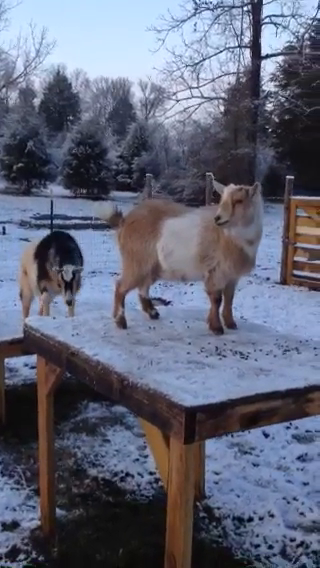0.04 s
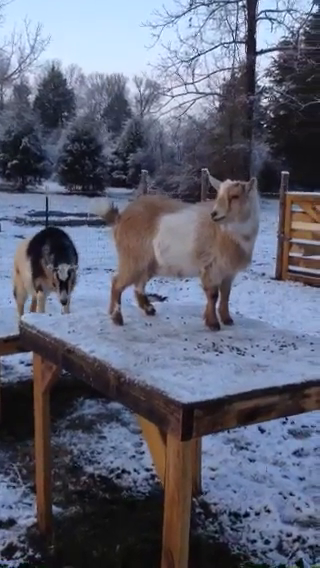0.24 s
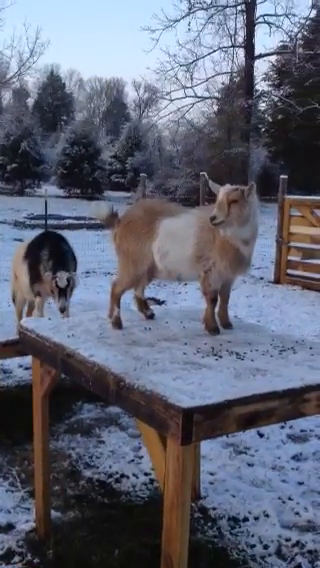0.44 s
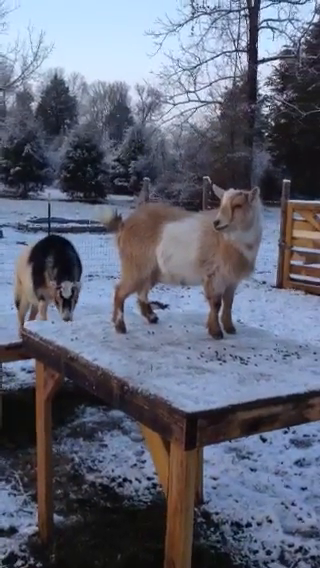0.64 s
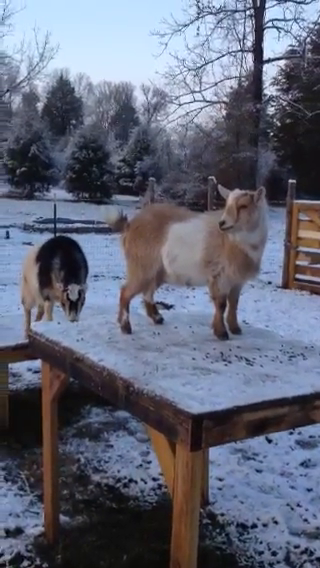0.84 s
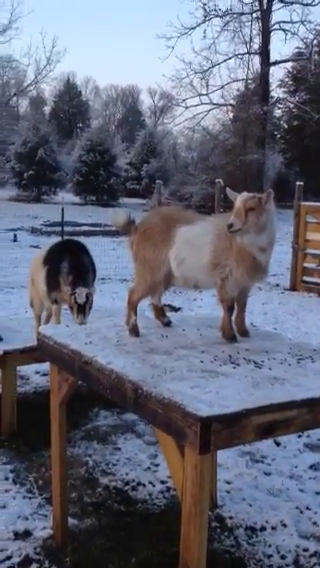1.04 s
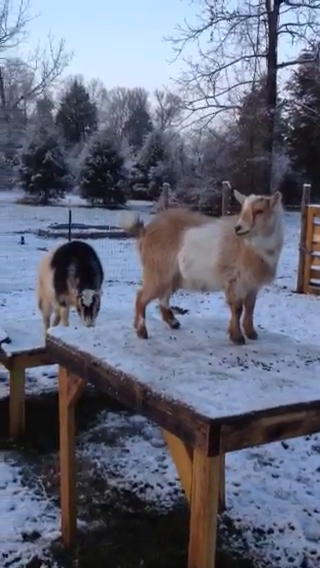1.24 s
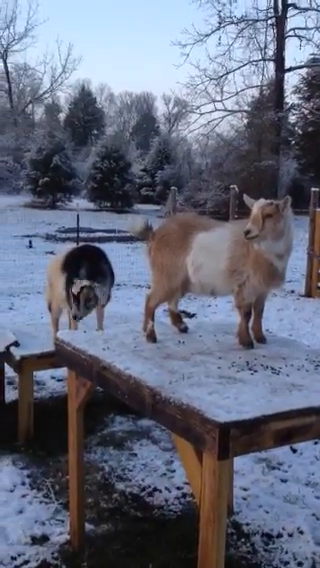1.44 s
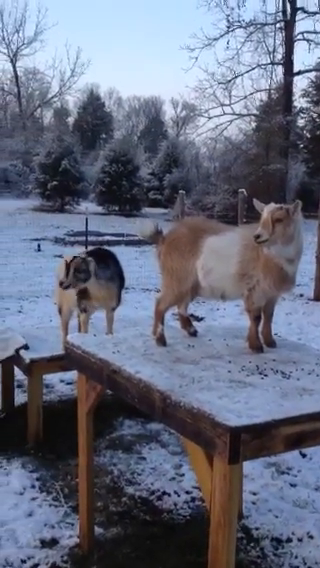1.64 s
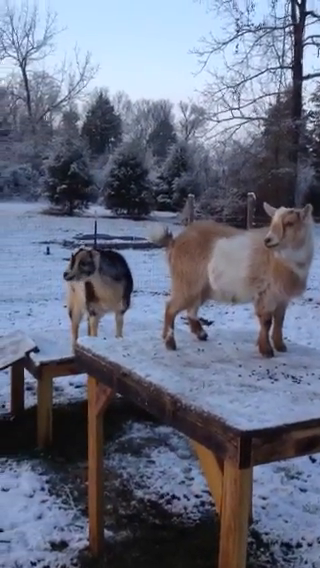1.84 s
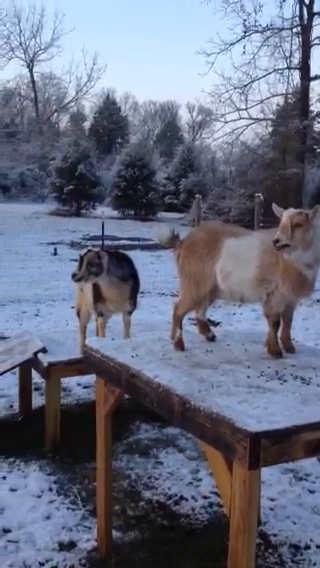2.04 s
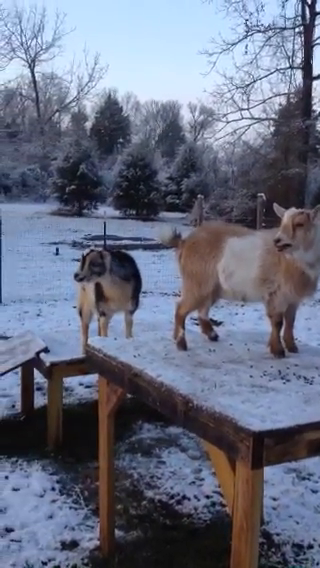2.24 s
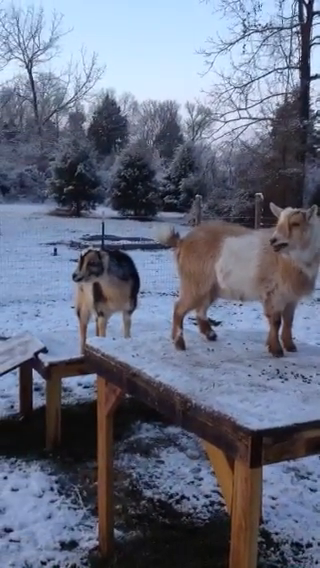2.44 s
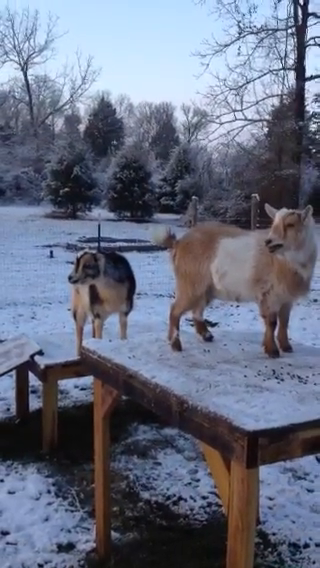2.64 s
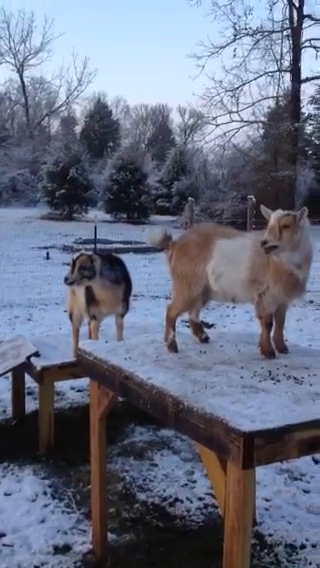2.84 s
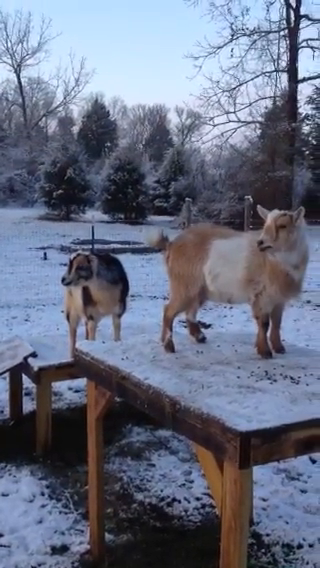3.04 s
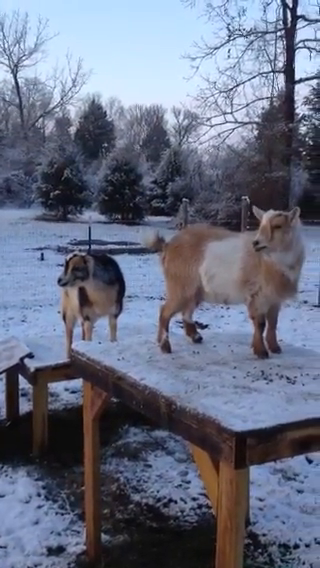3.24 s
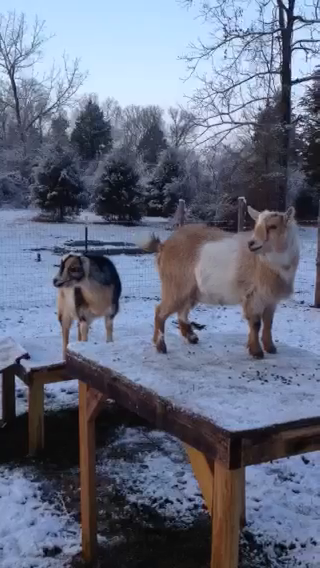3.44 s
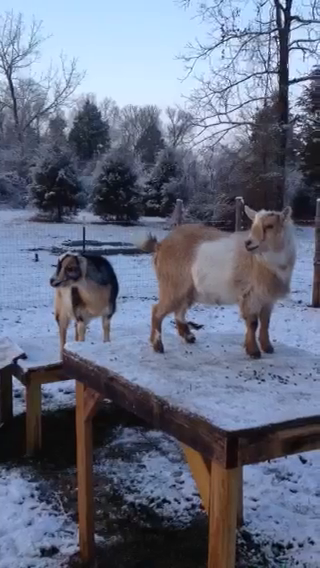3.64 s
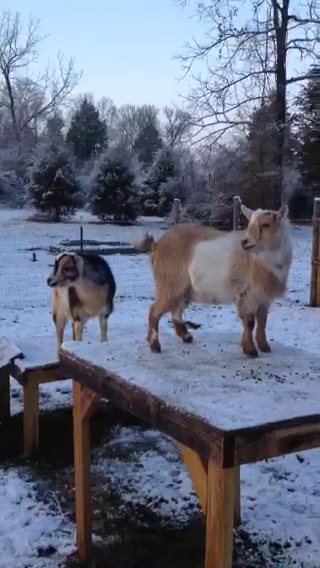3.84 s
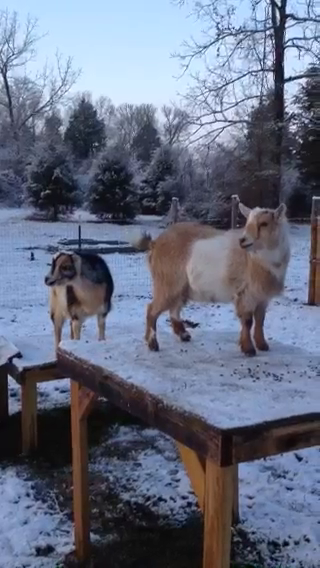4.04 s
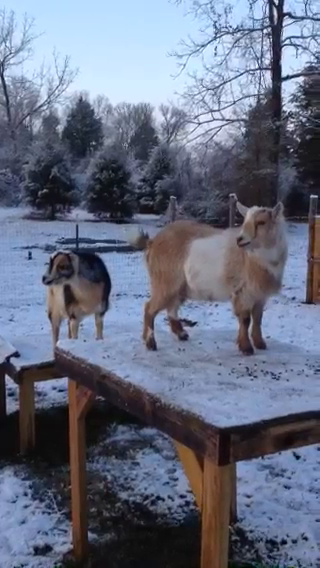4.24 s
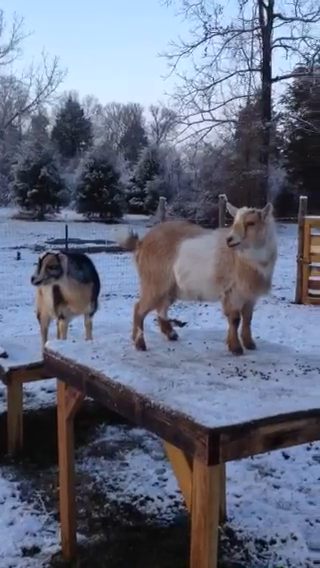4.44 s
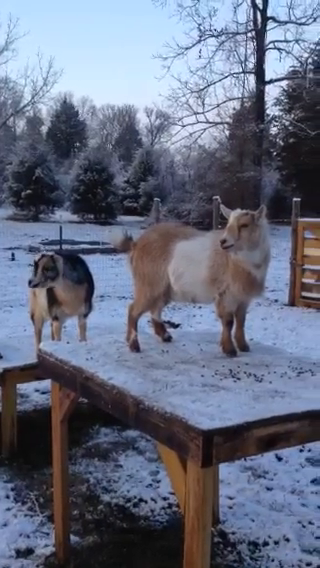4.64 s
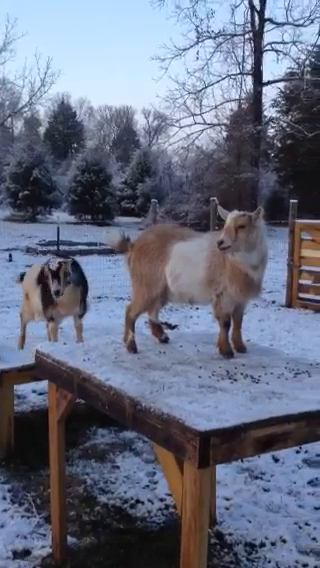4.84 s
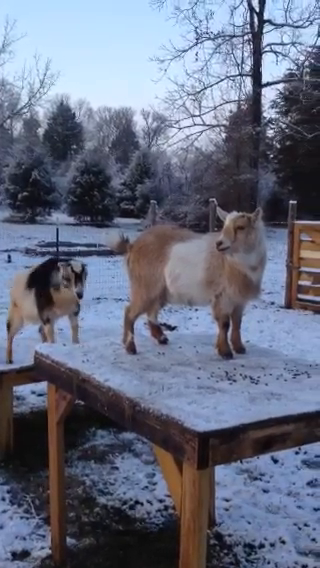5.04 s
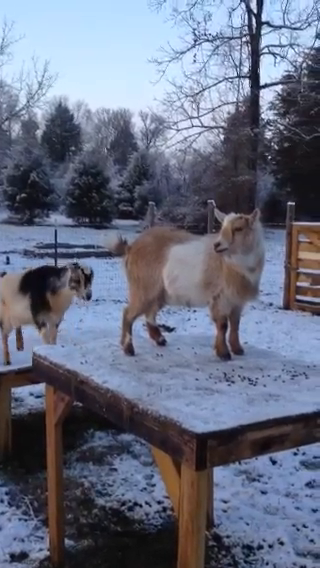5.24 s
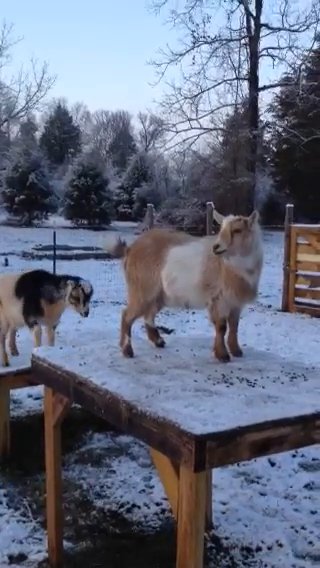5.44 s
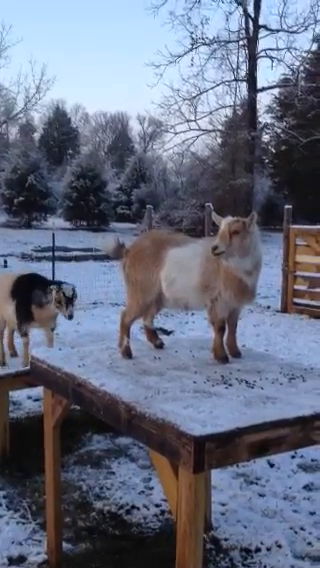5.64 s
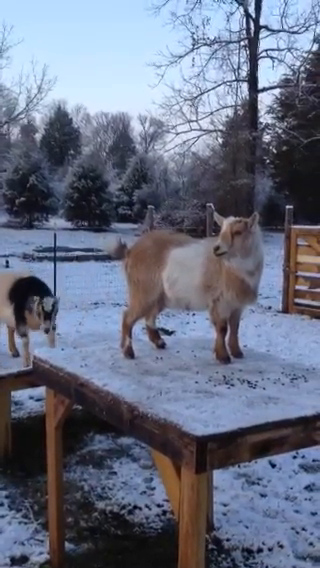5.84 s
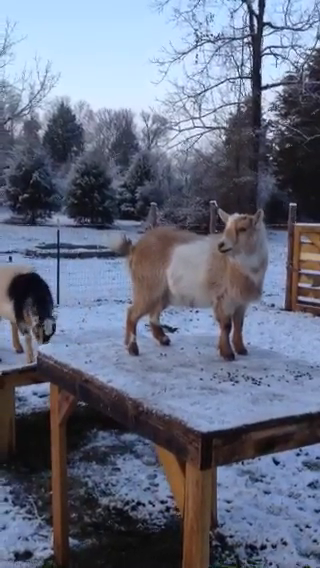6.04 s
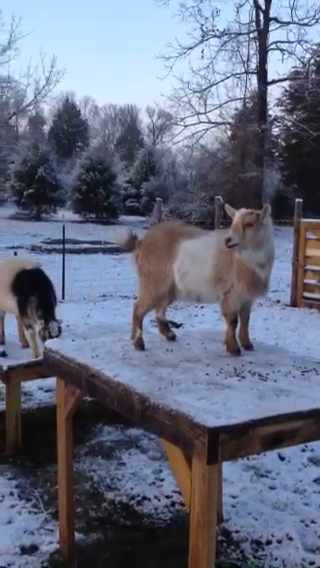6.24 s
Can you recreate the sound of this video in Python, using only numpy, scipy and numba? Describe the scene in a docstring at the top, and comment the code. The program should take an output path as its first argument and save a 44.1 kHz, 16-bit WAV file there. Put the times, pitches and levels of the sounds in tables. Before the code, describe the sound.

Still outdoor air with a very faint motor hum and rustle. A few light hoof taps on a wooden platform come first, with a barely audible far call. Around two seconds a goat puffs, then gives one loud, rough, fast-quavering bleat lasting about a second. Quiet returns, then a second goat's hooves knock and scuff on snowy boards. Close voice, short dull reflections, handheld microphone.

```python
"""Goat on a wooden platform in snow

A goat gives a short puff of breath, then one long quavering bleat: glottal pulses and turbulence excite
resonances of mouth and throat, and the voice cracks into slow hard pulses. Hooves strike resonant boards,
scuffs and the puff are swells of grainy noise, and delayed copies return from boards and wall. Behind lie
still winter air (coloured noise), a motor's hum (wavering sines), a faint rustle, one faint far call and
a thin high squeak (gliding tones).
"""
import sys
import numpy as np
from scipy import signal
from scipy.fft import rfft, irfft
from scipy.io import wavfile
from scipy.ndimage import uniform_filter1d
from numba import njit

SR = 44100
rng = np.random.default_rng(int(sys.argv[2]) if len(sys.argv) > 2 else 0)


def persist_wave(psi):
    """Save psi, clipped to +-1, as 16-bit WAV."""
    counts = np.round(np.clip(psi, -1, 1) * 32767).astype(np.int16)
    wavfile.write(sys.argv[1], SR, np.atleast_2d(counts).T)


N = 278271
TIME = np.arange(N) / SR

# Relative spectrum of still air, with a broad band of the motor hum near 120 Hz: (frequency [Hz], spectral
# density [dB per Hz])
AIR_SPECTRUM = [(25, -65), (48, -23.5), (60, -15), (85, -26), (120, -5), (150, -11), (330, -10.5),
                (530, -11.5), (940, -16.5), (1760, -23.5), (2540, -24.5), (6500, -36), (10300, -49.5),
                (13000, -37)]
# Partials of the motor hum: (frequency [Hz], mean level [dB])
HUM_PARTIALS = [(118.4, -66), (296.1, -74), (333.8, -74.5), (479.1, -77.5), (532.9, -80), (651.4, -80.5),
                (888.2, -76.5)]
# Course of the faint rustle: (time [s], mean level [dB])
RUSTLE_COURSE = [(0, -72), (.25, -72), (.6, -77.5), (3, -77), (5, -78.5), (5.6, -75), (6.31, -75.5)]
# Thin squeak: (time [s], frequency [Hz], mean level [dB])
SQUEAK_COURSE = [(1.44, 12200, -95), (1.51, 12850, -84), (1.55, 12400, -86), (1.62, 13400, -82),
                 (1.68, 12700, -86), (1.77, 11800, -84), (1.8, 12200, -81), (1.83, 11900, -95)]
# Far call: (time [s], frequency [Hz], mean level [dB])
FAR_CALL_COURSE = [(.8, 557, -82), (.85, 590, -69), (.92, 551, -63.5), (.97, 605, -61.5), (1.0, 603, -73)]
# Echoes from boards and wall: (delay [s], level within the reflected sound [dB], low-pass cut-off [Hz])
YARD_ECHOES = [(.0058, -20, 6200), (0.0224, -13, 3570)]
# Snow scuffs, and at 1.925 s a short puff of the goat's breath before the bleat:
# (middle [s], length [s], level before the shared resonance [dB], centre frequency [Hz])
SCUFFS_AND_BREATH = [(0.156, 0.017, -67.5, 3980), (1.566, 0.023, -69, 3340), (1.925, 0.022, -63, 3900),
                     (5.165, 0.029, -66.5, 2190), (5.261, 0.021, -59, 1220), (5.485, 0.096, -63, 2300),
                     (5.728, 0.022, -59.5, 2040), (5.823, 0.0086, -61.5, 2000), (6.003, 0.19, -71, 2370),
                     (6.238, 0.016, -66, 2400)]
# Resonance shared by these swells, as the boards sing under a scuff: (frequency [Hz], width [Hz], lift [dB])
SCUFF_RESONANCE = [(4580, 100, 8.5)]
# Hoof knocks; the row at 5.7808 s is the wall's return of the knock at 5.757 s:
# (time [s], thud [dB], body [dB], clack [dB], crack [dB], tick [dB],
# note of the struck spot [Hz], decay time of the crunch [s], wall echo [dB])
KNOCKS_AND_RETURN = [(.469, -64.5, -64, -64, -69, -74, 1110, 0.016, -7),
                     (1.0512, -53, -51, -56.5, -63, -73, 620, 0.0048, -6.5),
                     (1.262, -77, -76, -54, -72, -76, 1130, 0.0032, -3),
                     (5.1135, -47, -49.5, -61, -59, -59.5, 227, 0.0071, -6),
                     (5.188, -65, -62, -68, -67.5, -70, 1400, .006, -12),
                     (5.3136, -53.5, -49.5, -52.5, -65.5, -71, 990, 0.0097, -9),
                     (5.351, -74, -65, -70, -70, -74.5, 1500, 0.0047, -8),
                     (5.4862, -44.5, -43.5, -51, -49.5, -50.5, 392, 0.013, -12),
                     (5.517, -69, -62, -55, -57.5, -68, 396, 0.011, -17),
                     (5.6782, -64, -59, -64, -63.5, -66.5, 605, 0.0035, -6),
                     (5.757, -56, -61, -58.5, -66, -68.5, 1150, .012, -4),
                     (5.7808, -62.5, -63, -54.5, -64, -71, 1210, .006, -8),
                     (5.9650, -66, -58, -54, -58.5, -62.5, 1250, 0.0034, -4.5),
                     (6.169, -79, -60, -58.5, -64.5, -63, 1070, 0.0094, -6.5)]
# Edges of the thud, body, clack, crack and tick bands: (frequency [Hz])
KNOCK_EDGES = [130, 330, 800, 1800, 3600, 7200]
# Resonances of the boards: (frequency [Hz], width [Hz], lift [dB])
BOARD_RESONANCES = [(165, 65, 2.5), (230, 54, 4.5), (315, 45, 4), (402, 21, 11), (504, 16, 7), (742, 60, 5),
                    (1630, 120, -0.5), (2320, 120, 7.5), (3100, 120, 4.5), (4300, 140, 8), (4570, 106, 9)]
# Bleat beneath its quaver: (time [s], resting pitch [Hz], base vowel level [dB], base rasp level [dB])
BLEAT_COURSE = [(2.014, 325.8, -63, -61.5), (2.055, 332.6, -51, -53), (2.078, 314, -58, -47.5),
                (2.1, 320, -50, -46), (2.14, 338, -56, -45.5), (2.24, 347.7, -46.5, -43),
                (2.41, 352.5, -49, -44.5), (2.54, 381.7, -47.5, -44.5), (2.61, 355, -43.5, -43),
                (2.70, 365.5, -46.5, -43), (2.765, 379.2, -47.5, -42.5), (2.84, 370.7, -44, -43),
                (2.91, 381.8, -46.5, -43), (2.98, 363.3, -48.5, -46.5), (3.015, 336.2, -47, -50.5),
                (3.04, 286, -44.5, -56.5), (3.052, 180, -45, -53), (3.068, 160.7, -49, -53.5),
                (3.09, 161, -52, -69)]
# Crests of the quaver, about fourteen a second: (time [s], length [s], top pitch [Hz], rasp lift [dB],
# bright-ring centre [Hz], added turbulence [0-1], slap after it [dB], vowel throb after it [dB])
QUAVER_CRESTS = [(2.025, 0.03, 401.3, 8.5, 4550, 0.4, 4.5, 1), (2.125, 0.024, 405.4, 6.5, 4850, .05, 4, 14),
                 (2.202, 0.025, 404, 2.5, 5370, 0, 2.5, 7.5), (2.261, .022, 408.7, 0.5, 5500, 0, -1, 5),
                 (2.322, 0.022, 408.4, 1.5, 5070, 0.3, -1, 6.5),
                 (2.379, 0.033, 430, 5.5, 5030, .05, 2.5, 7), (2.447, 0.034, 435.3, 9, 5360, 0.3, 5, 7.5),
                 (2.508, 0.032, 428, 3.5, 4900, 0, 0, 4), (2.575, 0.028, 451, 7, 4530, 0.6, 1, 2),
                 (2.661, .03, 437.7, 6, 4900, 0.4, 1.5, 3.5), (2.733, 0.032, 428.2, 2, 5470, 0.3, -3, 5.5),
                 (2.795, 0.036, 452.1, 4.5, 4730, 0.2, -1, 1.5),
                 (2.878, 0.031, 445.6, 2.5, 5460, 0.3, -1.5, 4), (2.939, 0.023, 416, 3, 6080, 0, 0, 1.5)]
# Cracks into slow pulses: (peak [s], length before the peak [s], pulse rate at the peak [Hz],
# peak level change [dB], width of the burst [s])
VOICE_CRACKS = [(2.112, 0.046, 234.4, 9.5, 0.018), (2.182, .022, 263.3, 10.5, 0.017),
                (2.249, 0.014, 286.5, 7.5, 0.015), (2.308, 0.01164, 275.4, 8.5, 0.019),
                (2.6414, 0.028, 282.6, 8, 0.023)]
# Moments when the rasp catches: (time [s], length [s], level change [dB])
RASP_CATCHES = [(2.074, 0.02, 0), (2.134, 0.0066, -7), (2.163, .012, -5.5), (2.217, 0.011, -4),
                (2.24, 0.0078, -4), (2.299, .008, -5), (2.358, 0.0075, -6), (2.423, 0.0093, -4),
                (2.459, 0.0087, -7.5), (2.498, 0.0062, 1), (2.558, .012, -1.5), (2.68, .007, -6),
                (2.71, 0.0098, -2.5), (2.754, 0.011, -2.5), (2.85, 0.019, -5.5), (2.894, .012, -1.5)]
# Opening and closing mouth: (time [s], first resonance [Hz], base bright-ring lift [dB],
# base top-treble lift [dB])
MOUTH_COURSE = [(2.036, 675, 5, -6), (2.055, 714, -14, 14), (2.12, 930, 7.5, 5), (2.22, 1044, 1, 12.5),
                (2.4, 1090, 8, 2), (2.55, 1098, 7.5, 1.5), (2.97, 1088, 7.5, 5), (3.005, 920, 9, -1),
                (3.04, 806, -5, -3), (3.08, 684, -6, -5)]
# Small fixed resonance of the mouth: (frequency [Hz], width [Hz], lift [dB])
VOWEL_RESONANCE = [(905, 50, 7)]
# Resting resonances and hollows of throat and nose: (frequency [Hz], width [Hz], lift [dB])
UPPER_RESONANCES = [(1950, 400, 4), (3130, 60, 2), (3590, 80, 4), (3930, 130, 5), (4750, 70, 11.5),
                    (5005, 170, -15), (5190, 70, 4), (5550, 120, 4), (5960, 70, 3), (6400, 500, 1),
                    (7000, 130, 3), (7380, 140, 4), (8500, 500, -5)]

# Hooves: a knock's band levels are its power over KNOCK_S; the toe touches first and more lightly
KNOCK_S, HEEL_S, TOE_SHARE = .018, 0.001986, .35
# Quaver: squareness 2 is a round bell, more gives a flat top
CREST_SQUARENESS = 2.6
CREST_LEAN_S, CREST_PUSH_SHARE = 0.0028, 0.8   # offset and relative length of the push on the rasp
# After a crest the vowel dips, then the folds slap; the moments are shares of the crest's length
DIP_AT, DIP_S, DIP_DB = 0.67, 0.013, -10
FLARE_AT, FLARE_S, FLARE_TOP_DB = 0.96, 0.0054, 7.5
# Cracks: the pulses speed up, then the voice snaps back; each starts choked and bursts out abruptly
CRACK_RISE_HZ_PER_S, CRACK_RELEASE_S = 2200, .008
CHOKE_DB, BURST_SQUARENESS = -9, 2.7
CRACK_RING_DB, CRACK_CLEARS = 8.5, .5   # extra bright ring; share of turbulence that stops
# Folds: random pitch deviation as a share of pitch; they take a while to settle
JITTER, CREAK_JITTER, UNSTEADY_JITTER, UNSTEADY_S = .007, .025, .036, .36
TURBULENCE, ONSET_TURBULENCE, ONSET_S = .24, 1.0, .06
TROUGH_TURBULENCE, FIRM_DB = .38, 5   # hiss of slack folds; push that firms them fully
# Mouth: moving first resonance; share of the crack's swing that reaches the vowel
MOUTH_WIDTH_HZ, MOUTH_LIFT_DB, VOWEL_FOLLOWS = 50, 17.5, 0.16
SHUT_HZ, OPEN_HZ = 740, 1087   # first resonance when nearly shut and when open
# Throat: a resonance heard through the open mouth, and a hollow around it when nearly shut
THROAT_HZ, THROAT_WIDTH_HZ, THROAT_DB, SHUT_HOLLOW_DB = 2588, 66, 12.5, -5.5
THROAT_GIVE, THROAT_TREMBLE = 0.058, 0.0058   # relative shift per share of pitch rise, and by chance
# Bright ring: it slides down through each crest, and its lift follows the crest's push (dB per dB)
REST_RING_HZ, RING_WIDTH_HZ, RING_WANDER_HZ = 6560, 1400, 250
RING_FALL_HZ_PER_S, CREST_RING_GAIN = 38000, 0.85
# Nose: it rings as the mouth closes
NASAL_HZ, NASAL_WIDTH_HZ, NASAL_DB, CLOSING_S = 1725, 69, 18, 0.18
# Sizzle: thin airy top; level against the rasp and share of the rasp's swings
SIZZLE_BAND_HZ, SIZZLE_DB, SIZZLE_FOLLOWS = [10900, 14600], -36, .8


def from_db(db):
    """Logarithmic level: decibels to amplitude gain."""
    return 10 ** (np.asarray(db) / 20)


def rms_one(x):
    """Normalisation: scale to unit mean power."""
    return x / np.sqrt(np.mean(x ** 2) + 1e-20)


def constant(value):
    """Stationarity: a curve that keeps one value."""
    return np.full(N, float(value))


def in_time(rows):
    """Linear interpolation: one curve for each column after time."""
    s, *columns = np.transpose(rows)
    return [np.interp(TIME, s, c) for c in columns]


def smooth(x, seconds):
    """Moving average: two equal windows give a triangular weighting."""
    size = max(1, int(seconds * SR))
    return uniform_filter1d(uniform_filter1d(x, size), size)


def span(start_s, end_s, edge_s):
    """Gating: open between two moments, with soft edges."""
    return smooth(1. * (TIME > start_s) * (TIME < end_s), edge_s)


def during(rows):
    """Gating: open over the span of a table."""
    return span(rows[0][0], rows[-1][0], 0.0059)


def bell(s, length_s, squareness=2):
    """Envelope: a swell of height 1 around a moment, length_s wide at half height."""
    offset = np.minimum(np.abs(2 * (TIME - s) / length_s), 10)
    return np.exp(-np.log(2) * offset ** squareness)


def drift(rate_hz):
    """Random modulation: joined chance values of unit spread, rate_hz of them a second."""
    knots = rng.standard_normal(4000)
    return np.interp(TIME * rate_hz, np.arange(len(knots)), knots)


def cut(x, hz, kind, order=2):
    """Band limitation: a Butterworth filter."""
    edges = np.clip(hz, 10, .45 * SR)
    return signal.sosfilt(signal.butter(order, edges, kind, fs=SR, output="sos"), x + 1e-18)


def tone(hz):
    """Phase integration: a sine of unit power along a pitch curve."""
    return np.sqrt(2) * np.sin(2 * np.pi * np.cumsum(hz) / SR)


def noise(spectrum):
    """Spectral shaping: coloured noise with unit power above 150 Hz."""
    hz, level_db = np.transpose(spectrum)
    bins = np.maximum(np.fft.rfftfreq(N, 1 / SR), 1)
    colour = from_db(np.interp(np.log(bins), np.log(hz), level_db))
    out = irfft(rfft(rng.standard_normal(N)) * colour, N)
    return out / np.std(cut(out, 150, "high"))


def resonate(x, peaks):
    """Resonance: a chain of fixed modes, each lifting or lowering its own band."""
    for hz, width_hz, lift_db in peaks:
        a = np.pi * width_hz / SR
        c = -2 * np.cos(2 * np.pi * hz / SR)
        g = from_db(lift_db)
        x = signal.lfilter([1 + a * g, c, 1 - a * g], [1 + a, c, 1 - a], x)
    return x


@njit
def sweep(x, hz, width_hz, lift):
    """Time-varying resonance: a state-variable filter whose centre and gain may move."""
    out, band, low = np.zeros(len(x)), 0., 0.
    for i in range(len(x)):
        g, k = np.tan(np.pi * hz[i] / SR), width_hz / hz[i]
        v = (band + g * (x[i] - low)) / (1 + g * (g + k))
        band, low = 2 * v - band, low + 2 * g * v
        out[i] = x[i] + (lift[i] - 1) * k * v
    return out


def still_air():
    """Broadband noise: a coloured floor with two resonances."""
    return from_db(-64) * resonate(noise(AIR_SPECTRUM), [(1746, 122, 7.3), (4470, 85, 6.5)])


def motor_hum(waver_hz=2.2, flutter_db=-1.0):
    """Additive synthesis: partials that each waver at random in pitch and level."""
    hum = 0
    for hz, level_db in HUM_PARTIALS:
        partial = tone(hz + waver_hz * drift(14))
        hum = hum + from_db(level_db + flutter_db * drift(11)) * partial
    return hum


def faint_rustle():
    """Amplitude modulation: band noise whose level wavers about a slow course."""
    hiss = rms_one(cut(rng.standard_normal(N), [2000, 9000], "band", order=1))
    return from_db(in_time(RUSTLE_COURSE)[0] + 2.3 * drift(32)) * hiss


def faint_call(rows):
    """Frequency modulation: a nearly pure gliding tone, slightly unsteady."""
    hz, level_db = in_time(rows)
    unsteady_hz = smooth(hz, 0.016) * (1 + 0.0023 * drift(160))
    return during(rows) * from_db(level_db + 2 * drift(50.5)) * tone(unsteady_hz)


def scatter(x, t60, start_s, band_hz):
    """Diffuse reflection: convolution with a decaying noise tail of unit energy, then a band limit."""
    t = TIME[:SR // 2]
    tail = rng.standard_normal(len(t)) * np.exp(-np.log(1000) * t / t60) * (t > start_s)
    return cut(signal.fftconvolve(x, tail / np.linalg.norm(tail))[:N], band_hz, "band")


def yard(x, wet_db):
    """Reflection: distinct echoes, and a short scatter from fence and trees that the snow soon swallows."""
    wet = from_db(-12) * scatter(x, 0.21, 0.0046, [100, 5000])
    for delay_s, echo_db, cut_hz in YARD_ECHOES:
        dulled = cut(x, cut_hz, "low", order=1)
        wet += from_db(echo_db) * np.interp(TIME - delay_s, TIME, dulled, left=0)
    return x + from_db(wet_db) * wet


def scuffs_and_breath(grain_db=4.5):
    """Granular noise: brief swells as snow is pushed aside, and one puff of breath made the same way."""
    grains, out = rng.standard_normal(N) * from_db(grain_db * drift(600)), 0
    for s, length_s, level_db, hz in SCUFFS_AND_BREATH:
        swell = np.exp(-2 * ((TIME - s) / length_s) ** 2)
        out = out + from_db(level_db) * swell * rms_one(cut(grains, [hz / 2, hz * 2], "band"))
    return resonate(out, SCUFF_RESONANCE)


def hooves(crunch=0.094, grain_db=6, note_q=5.5, note_db=13, wall_s=0.02, wall_hz=5000):
    """Impact excitation: toe, heel and crushed snow ring the boards, and the wall returns a dull echo."""
    t, out = TIME[:SR // 4], np.zeros(N + SR)
    # the wall's return that has its own row is built like a knock
    for s, *levels_db, note_hz, fade_s, echo_db in KNOCKS_AND_RETURN:
        contact = crunch * rng.standard_normal(len(t)) * from_db(grain_db * drift(883)[:len(t)])
        contact *= np.minimum(t / HEEL_S, 1) * np.exp(-t / fade_s)
        contact[0] += TOE_SHARE
        contact[int(HEEL_S * SR)] += 1
        wood = resonate(contact, BOARD_RESONANCES + [(note_hz, note_hz / note_q, note_db)])
        knock = 0
        for k, level_db in enumerate(levels_db):
            band = cut(wood, KNOCK_EDGES[k:k + 2], "band", order=3)
            knock = knock + from_db(level_db) * np.sqrt(KNOCK_S * SR) * band / np.linalg.norm(band)
        echo = from_db(echo_db) * cut(knock, wall_hz, "low", order=1)
        for start_s, sound in (s, knock), (s + wall_s, echo):
            at = int(start_s * SR)
            out[at:at + len(t)] += sound
    return out[:N]


def quaver(rest_hz):
    """Vibrato: crests lift pitch and rasp, roughen the voice and lower the bright ring; a slap follows."""
    pitch_hz, lift_db, centre_hz, rough = rest_hz, 0, REST_RING_HZ, 0
    for s, length_s, top_hz, crest_db, ring_hz, turbulence, slap_db, _ in QUAVER_CRESTS:
        pitch_hz = pitch_hz + bell(s, length_s, CREST_SQUARENESS) * (top_hz - rest_hz)
        # the rasp peaks a little after the pitch
        late_s = s + CREST_LEAN_S
        push = bell(late_s, CREST_PUSH_SHARE * length_s)
        lift_db = lift_db + push * crest_db + slap_db * bell(s + FLARE_AT * length_s, FLARE_S)
        rough = rough + push * turbulence
        slide_hz = ring_hz - RING_FALL_HZ_PER_S * (TIME - s - CREST_LEAN_S)
        centre_hz = centre_hz + bell(late_s, length_s, CREST_SQUARENESS) * (slide_hz - REST_RING_HZ)
    return pitch_hz, lift_db, centre_hz, rough


def after_crests(share, length_s):
    """Periodic modulation: one short swell at the same stage of every quaver."""
    return sum(bell(s + share * crest_s, length_s) for s, crest_s, *_ in QUAVER_CRESTS)


def cracks(pitch_hz):
    """Register break: slow quickening pulses; gives pitch [Hz], degree of crack [0-1] and swing [dB]."""
    cracked, swing_db = 0, 0
    for s, length_s, rate_hz, peak_db, burst_s in VOICE_CRACKS:
        inside = span(s - length_s, s + CRACK_RELEASE_S, 0.0051)
        pitch_hz = pitch_hz + inside * (rate_hz + CRACK_RISE_HZ_PER_S * (TIME - s) - pitch_hz)
        burst = bell(s, burst_s, BURST_SQUARENESS)
        swing_db = swing_db + inside * (CHOKE_DB + (peak_db - CHOKE_DB) * burst)
        cracked = cracked + inside
    return pitch_hz, cracked, swing_db


def glottis(pitch_hz, jitter, shimmer_db):
    """Source excitation: one sharp pulse per closure of the folds, and turbulence that swells each cycle."""
    cycles = np.cumsum(pitch_hz * (1 + jitter * drift(350))) / SR
    for s, *_ in VOICE_CRACKS:   # shift the phase so that a crack peaks on a closure
        count = cycles[int(s * SR)]
        cycles = cycles + (np.round(count) - count) * np.clip(1 + (TIME - s) / .03, 0, 1)
    at = np.flatnonzero(np.diff(np.floor(cycles)))[:-1]
    late = (np.ceil(cycles[at]) - cycles[at]) / (cycles[at + 1] - cycles[at])
    sizes = from_db(shimmer_db * drift(350))[at]
    pulses = np.zeros(N)
    for k in range(-5, 7):   # a windowed sinc places each pulse between samples
        pulses[at + k] -= sizes * np.sinc(k - late) * np.sinc((k - late) / 6)
    turbulence = rng.standard_normal(N) * np.exp(0.5 * np.cos(2 * np.pi * cycles))
    return rms_one(pulses), rms_one(turbulence)


def levelled(x):
    """Gain control: hold the power near 1 over a few voice cycles."""
    return x / np.sqrt(np.abs(smooth(x ** 2, .009)) + 1e-12)


def mouth_vowel(source, mouth_hz, gate):
    """Formant: a narrow moving resonance swells when a harmonic meets it; unit spread over the bleat."""
    low_band = cut(cut(source, 670, "high"), 1174, "low", order=6)
    vowel = resonate(low_band, VOWEL_RESONANCE)
    vowel = sweep(vowel, mouth_hz, MOUTH_WIDTH_HZ, constant(from_db(MOUTH_LIFT_DB)))
    return vowel / np.std(vowel[gate > .5])


def throat(x, strain):
    """Formant shift: the upper resonances fall as the voice strains, and tremble a little."""
    shift = 1 - THROAT_GIVE * strain + THROAT_TREMBLE * smooth(drift(45), .008)
    for hz, width_hz, lift_db in UPPER_RESONANCES:
        x = sweep(x, hz * shift, float(width_hz), constant(from_db(lift_db)))
    return x


def throat_rasp(source, strain, mouth_hz, top_db, centre_hz, ring_db, closing):
    """Source-filter principle: throat, mouth opening and nose shape the upper harmonics."""
    rasp = throat(cut(cut(source, 1640, "high"), 7800, "low"), strain)
    opening = np.clip((mouth_hz - SHUT_HZ) / (OPEN_HZ - SHUT_HZ), 0, 1)
    throat_hz = THROAT_HZ * (1 + THROAT_TREMBLE * drift(45))
    rasp = sweep(rasp, throat_hz, THROAT_WIDTH_HZ, from_db(THROAT_DB * opening))
    rasp = sweep(rasp, constant(THROAT_HZ), 1500.0, from_db(SHUT_HOLLOW_DB * (1 - opening)))
    # the folds close softly at the start and the end, which dulls the top
    rasp = sweep(cut(rasp, 8080, "low", order=4), constant(7600), 6200.0, from_db(top_db))
    wandering_hz = centre_hz + RING_WANDER_HZ * drift(40)
    rasp = sweep(rasp, wandering_hz, RING_WIDTH_HZ, from_db(ring_db))
    rasp = sweep(rasp, constant(NASAL_HZ), NASAL_WIDTH_HZ, from_db(NASAL_DB * closing))
    return levelled(rasp)


def goat():
    """Source-filter principle: pulses ring the mouth and throat; where the pitch sags the voice creaks."""
    start_s, end_s = BLEAT_COURSE[0][0], BLEAT_COURSE[-1][0]
    rest_hz, vowel_db, rasp_db = in_time(BLEAT_COURSE)
    mouth_hz, ring_db, top_db = in_time(MOUTH_COURSE)
    pitch_hz, lift_db, centre_hz, rough = quaver(rest_hz)
    pitch_hz, cracked, swing_db = cracks(pitch_hz)

    # levels through the quaver
    for s, length_s, *_, rise_db in QUAVER_CRESTS:
        vowel_db = vowel_db + rise_db * bell(s + FLARE_AT * length_s, 0.014)
    vowel_db = vowel_db + DIP_DB * after_crests(DIP_AT, DIP_S) + VOWEL_FOLLOWS * swing_db
    top_db = top_db + FLARE_TOP_DB * after_crests(FLARE_AT, FLARE_S)
    ring_db = ring_db + CRACK_RING_DB * cracked + CREST_RING_GAIN * lift_db
    catch_db = sum(depth_db * bell(s, length_s) for s, length_s, depth_db in RASP_CATCHES)
    effort_db = (1 - cracked) * lift_db + swing_db + catch_db

    creak = np.clip((295 - pitch_hz) / 70, 0, 1)
    unsteady = UNSTEADY_JITTER * bell(start_s, UNSTEADY_S) * (1 - cracked)
    jitter = JITTER + CREAK_JITTER * creak + unsteady
    pulses, turbulence = glottis(smooth(pitch_hz, .004), jitter, shimmer_db=1.2 + .2 * creak)
    # the bleat starts as a rush of air before the folds take hold
    airy = TURBULENCE * (1 - CRACK_CLEARS * np.maximum(cracked, creak))
    airy = airy + ONSET_TURBULENCE * bell(start_s, ONSET_S)
    source = (pulses + airy * turbulence) / np.hypot(1, airy)

    gate = during(BLEAT_COURSE)
    vowel = from_db(vowel_db) * mouth_vowel(source, mouth_hz, gate)

    # the treble hisses where the folds are slack, and where the hardest crests tear
    closing = bell(end_s, CLOSING_S)
    slack = np.clip(1 - lift_db / FIRM_DB, 0, 1) * (1 - cracked) * (1 - closing)
    hiss = cut(turbulence, 3000, "high", order=1)
    source = source + (TROUGH_TURBULENCE * slack + rough) * hiss
    strain = np.maximum(pitch_hz / rest_hz - 1, 0)
    rasp = throat_rasp(source, strain, mouth_hz, top_db, centre_hz, ring_db, closing)
    sizzle = rms_one(cut(source, SIZZLE_BAND_HZ, "band", order=3))
    sizzle = from_db(rasp_db + SIZZLE_DB + SIZZLE_FOLLOWS * effort_db) * sizzle
    return gate * (vowel + from_db(rasp_db + effort_db) * rasp + sizzle)


def scene():
    """Superposition: background, knocks, soft swells and voice add up, alike in both channels."""
    background = still_air() + motor_hum() + faint_rustle()
    calls = faint_call(FAR_CALL_COURSE) + faint_call(SQUEAK_COURSE)
    soft_swells = yard(scuffs_and_breath(), wet_db=5.5)
    knocks = hooves()
    knocks = knocks + from_db(-8) * scatter(knocks, 0.12, .006, [120, 5000])
    voice = goat()
    # the rough platform throws the treble back between the pulses
    voice = .9 * voice + from_db(-8) * scatter(voice, .04, .0004, [1800, 11000])
    voice = yard(voice, wet_db=-2)
    mono = background + calls + soft_swells + knocks + voice
    return np.array([mono, mono])


def record(dry):
    """Band limitation: a steep elliptic low-pass at 15.4 kHz."""
    return signal.sosfilt(signal.ellip(10, .1, 70, 15400, fs=SR, output="sos"), dry)


dry = scene()
out = record(dry)
persist_wave(out)
```